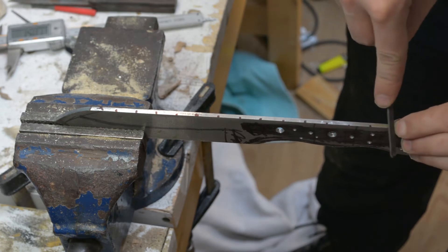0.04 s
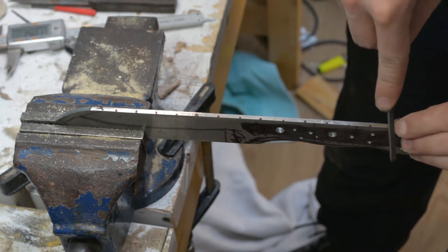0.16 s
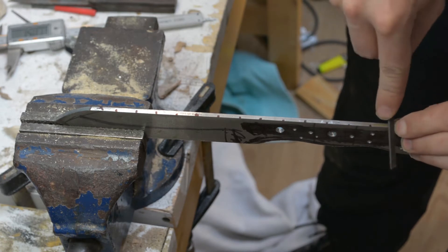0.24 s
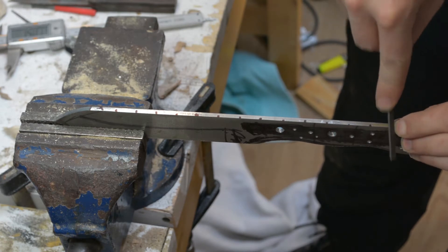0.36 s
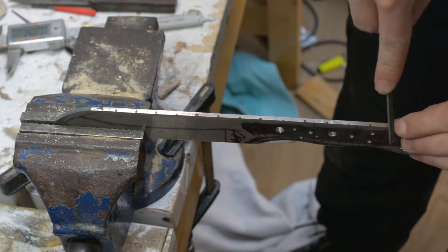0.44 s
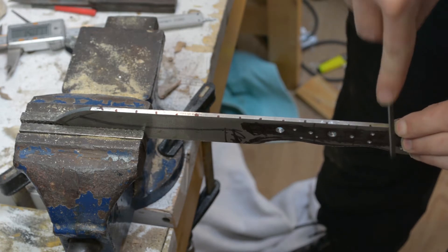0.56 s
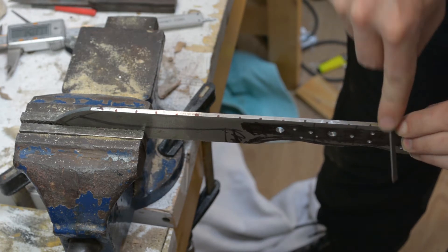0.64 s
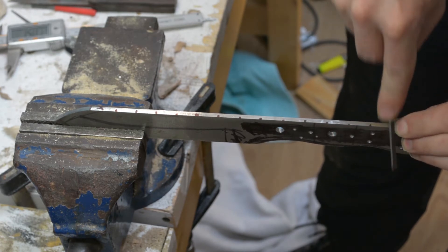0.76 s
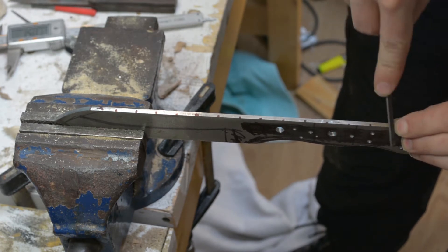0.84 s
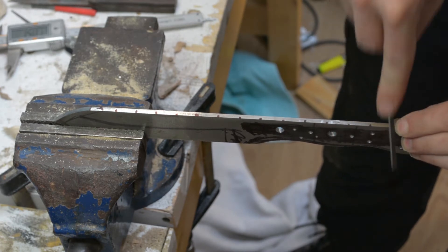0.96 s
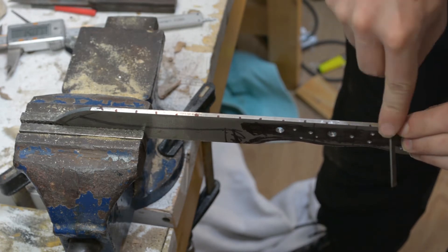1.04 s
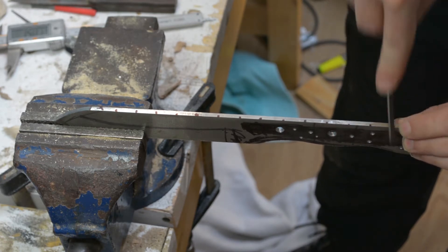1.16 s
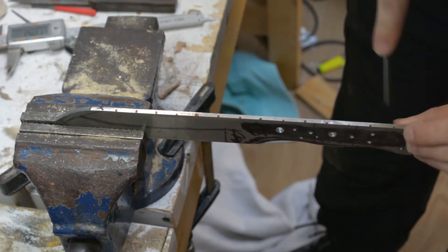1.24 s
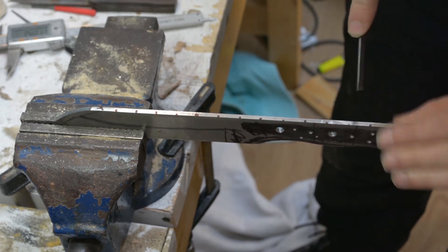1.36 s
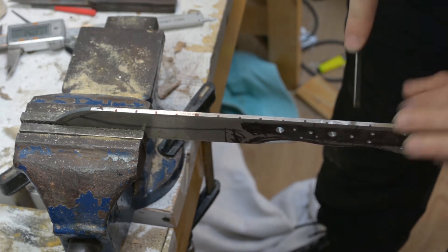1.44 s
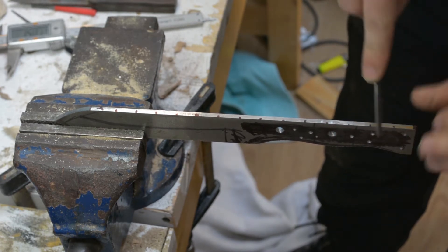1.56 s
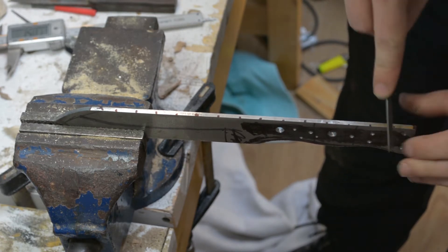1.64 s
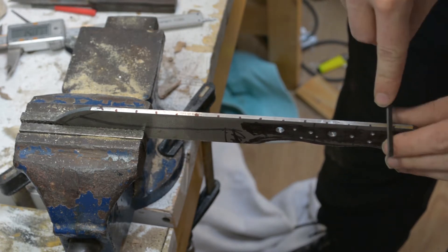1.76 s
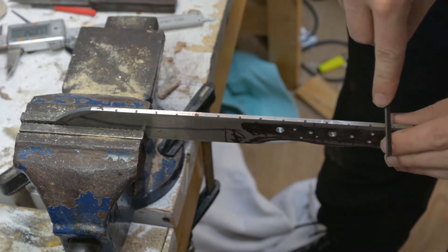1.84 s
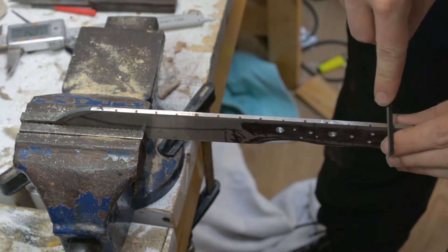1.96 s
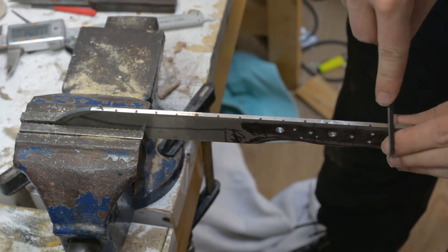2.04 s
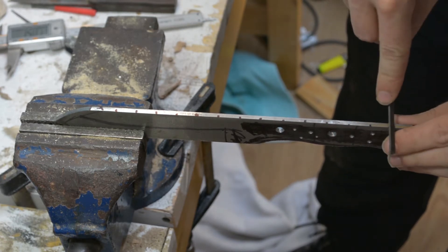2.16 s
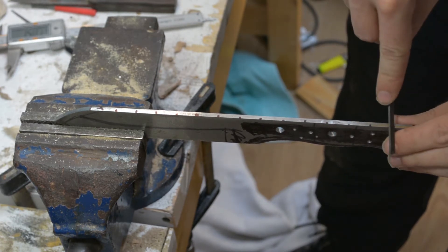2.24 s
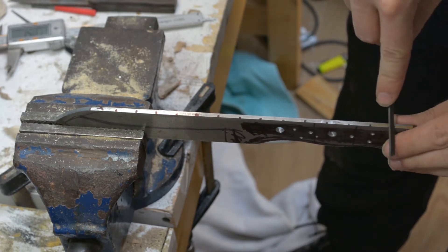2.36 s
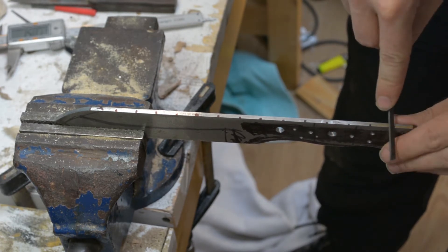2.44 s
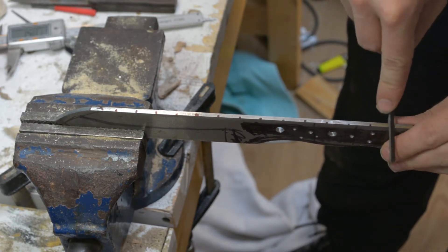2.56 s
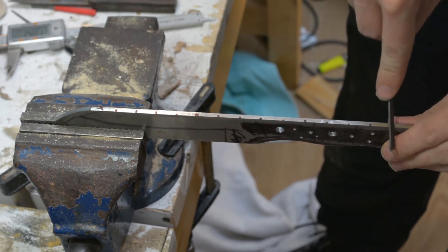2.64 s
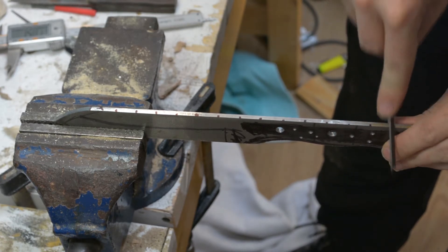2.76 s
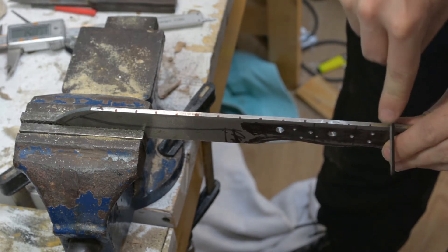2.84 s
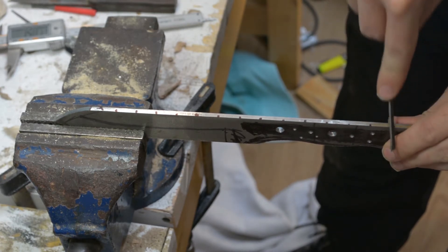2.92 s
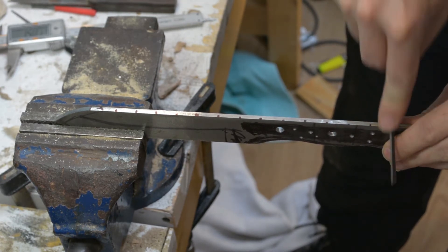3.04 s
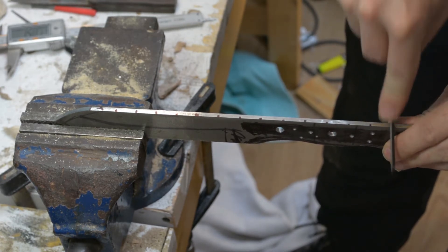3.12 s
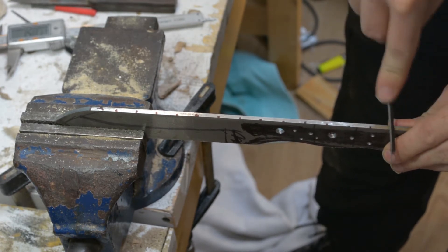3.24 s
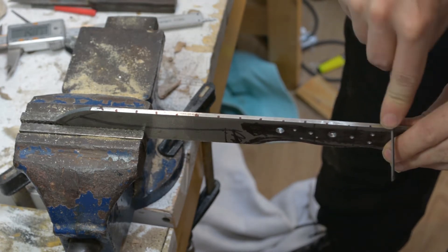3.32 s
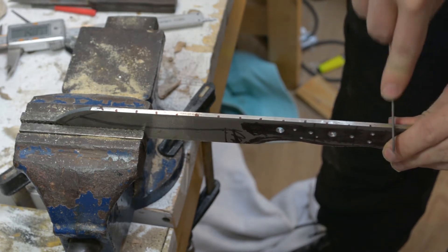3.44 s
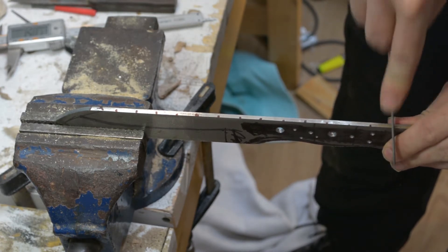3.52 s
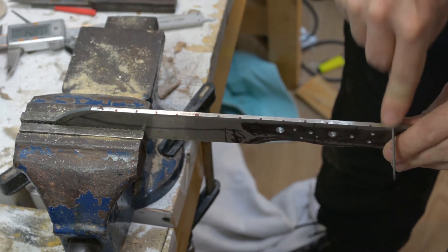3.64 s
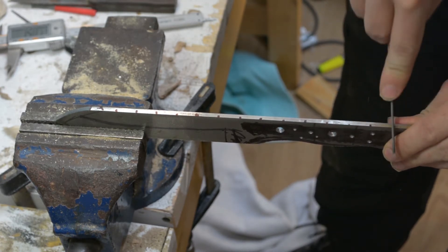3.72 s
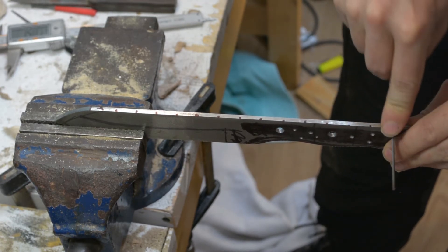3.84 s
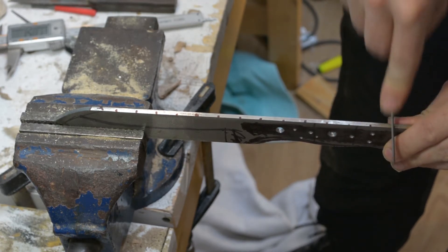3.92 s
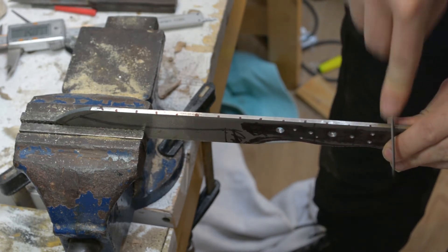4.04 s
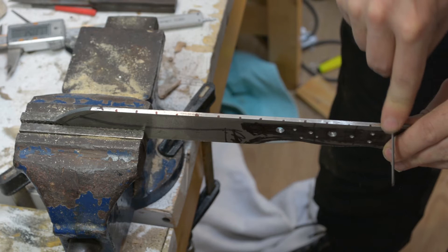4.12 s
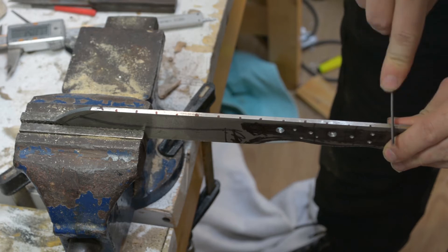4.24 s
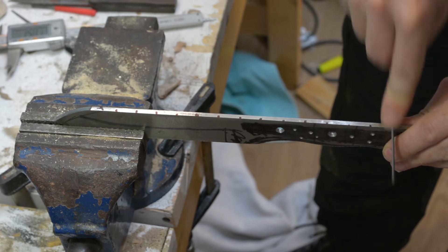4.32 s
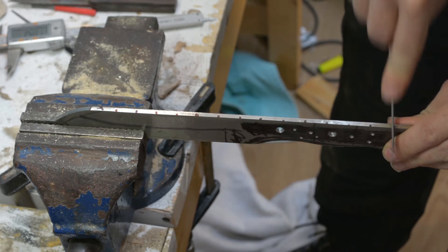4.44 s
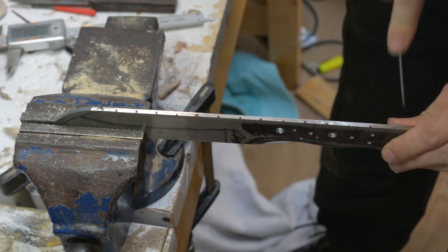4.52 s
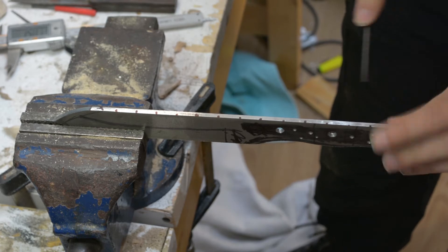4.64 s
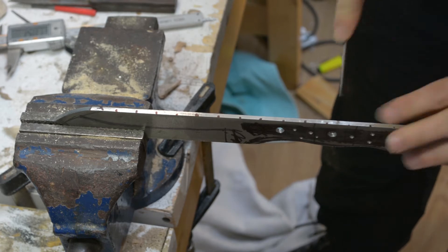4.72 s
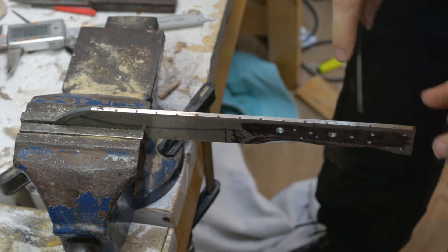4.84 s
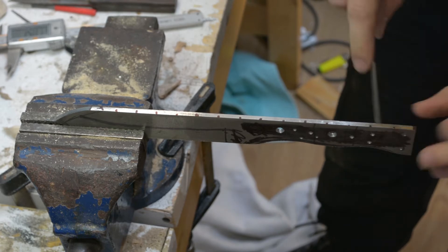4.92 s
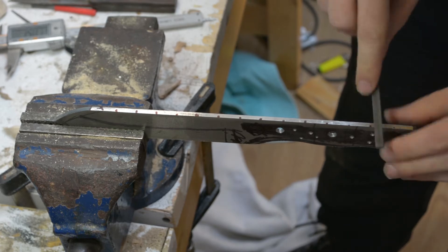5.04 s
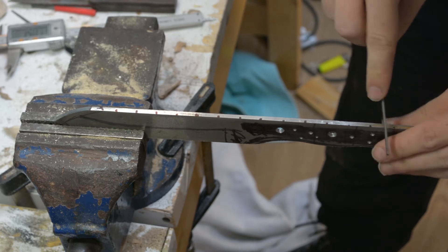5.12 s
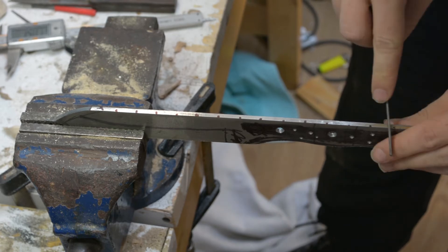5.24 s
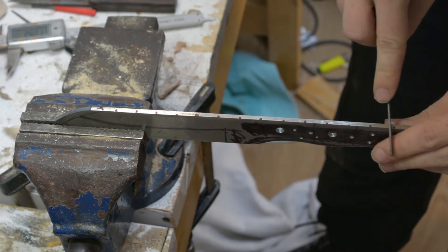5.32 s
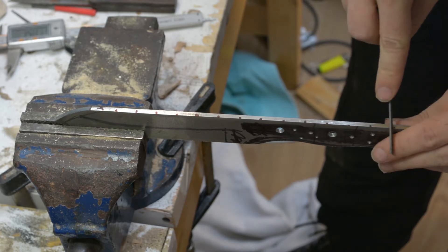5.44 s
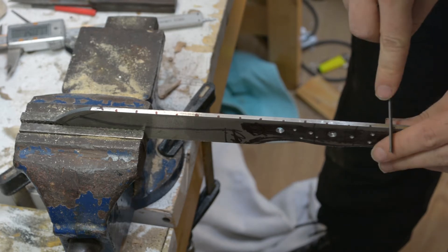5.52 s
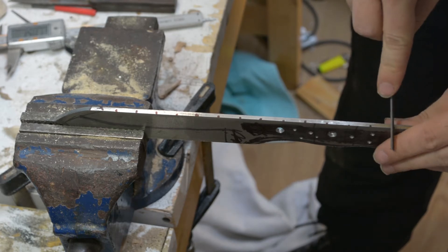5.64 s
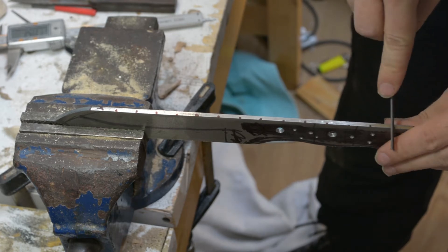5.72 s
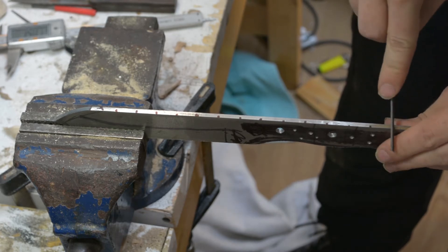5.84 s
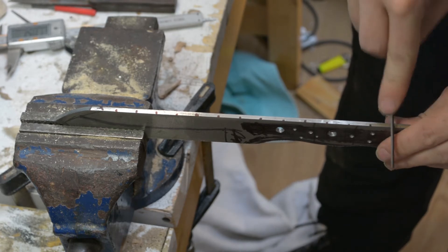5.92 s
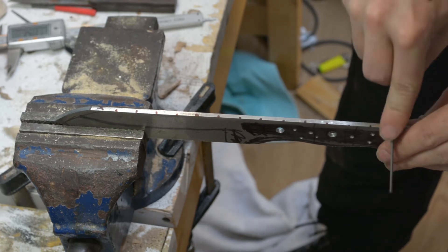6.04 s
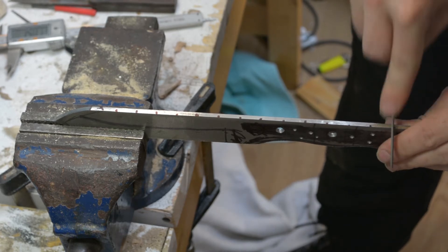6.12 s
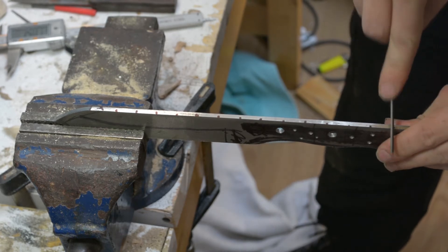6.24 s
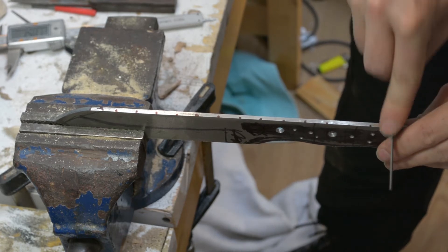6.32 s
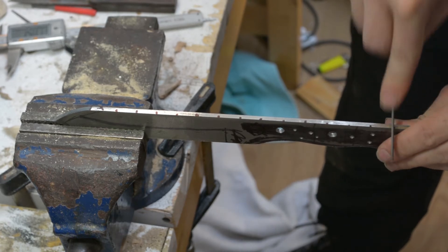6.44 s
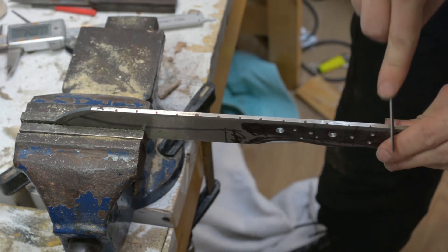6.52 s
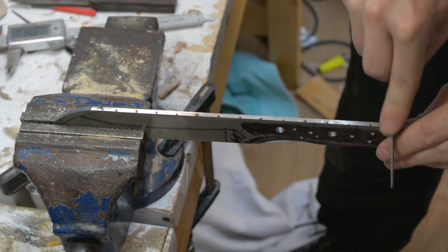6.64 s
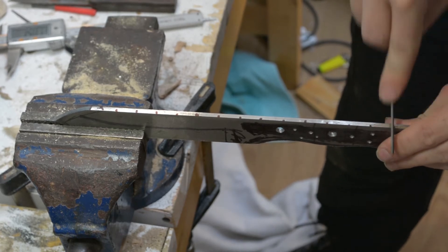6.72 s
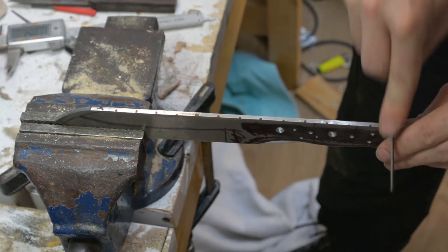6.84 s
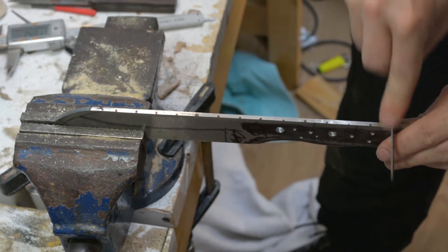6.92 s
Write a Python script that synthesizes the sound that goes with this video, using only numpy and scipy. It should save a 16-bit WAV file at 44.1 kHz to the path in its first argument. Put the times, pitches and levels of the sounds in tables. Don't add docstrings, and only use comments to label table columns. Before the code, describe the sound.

Close, dry metallic filing in a small workshop: gritty rasping strokes with ringing mids and bright scratchy hiss. The first bout accelerates and stops; near silence leaves a faint blade ring and thin electrical whine. Rapid seesaw strokes start almost inaudibly, settle into an even rhythm and stop on an accent. Light clinks and a short scrape precede a final strong burst that continues to the end.

```python
import sys
import numpy as np
from scipy import signal
from scipy.fft import rfft, irfft, next_fast_len
from scipy.io import wavfile
from scipy.ndimage import uniform_filter1d

SR = 44100
rng = np.random.default_rng(int(sys.argv[2]) if len(sys.argv) > 2 else 0)


def unload_wav(signal):
    wavfile.write(
        sys.argv[1],
        SR,
        np.round(np.clip(np.atleast_2d(signal).T, -1, 1) * 32767).astype(np.int16),
    )


def field_ratio(decibels):
    return 10 ** (np.asarray(decibels, dtype=float) / 20)


N = 307818
SIZE = next_fast_len(N + SR)
HZ = np.maximum(np.arange(SIZE // 2 + 1) * SR / SIZE, 1)
TIME = np.arange(N) / SR

# (f/Hz, width/Hz, lift/dB)
BLADE_MODES = [(325, 28, -9), (417, 15, -5), (528, 38, -5.5), (661, 22.5, 3), (757.4, 33, 0.),
               (904, 65, -6.5), (955, 30, -3), (1239, 25.5, 3), (1488, 7, 0), (1630, 10, -20),
               (1834, 13, -0.5), (1948, 32, -2), (2033, 69, -13), (2189, 85, 5), (2660, 180, 1),
               (2880, 14, 3.5), (3183, 13, 4), (3246, 85, 5.5)]


def rms_one(x):
    return x / np.sqrt(np.mean(x ** 2) + 1e-20)


def curve_db(points):
    hz, db = np.transpose(points)
    return np.interp(np.log(HZ), np.log(hz), db)


def below(hz, order):
    return 1 / (1 + (HZ / hz) ** order)


def above(hz):
    return 1 / (1 + (hz / HZ) ** 4)


def causal(gain):
    cepstrum = irfft(np.log(gain + 1e-9), SIZE)
    cepstrum[1:SIZE // 2] *= 2
    cepstrum[SIZE // 2 + 1:] = 0
    return np.exp(rfft(cepstrum))


def through(x, response):
    return irfft(rfft(x, SIZE) * response, SIZE)[..., :N]


def drift(rate_hz):
    r = np.exp(-2 * np.pi * rate_hz / SR)
    noise = rng.standard_normal(N + SR)
    return rms_one(signal.lfilter([1], [1, -2 * r, r * r], noise)[SR:])


def hush():
    # (f/Hz, level/dB per Hz)
    hiss_colour = [(15, -35), (25, -1.5), (93, -10.5), (198, 2), (297, -1), (722, 0), (1050, -1.5),
                   (1380, -2), (5010, -13.5), (5430, -15.5), (5880, -17), (10900, -23), (15500, -34)]
    # (f/Hz, side minus mid/dB)
    hiss_side = [(60, -16), (110, -9), (200, -13.5), (380, -4), (700, -2), (1290, -2.5), (2380, -2),
                 (4400, -1.5), (8120, -1.5), (15000, 0)]
    # (f/Hz, level/dB rms)
    whine = [(199, -79), (5545, -77), (11084, -85)]
    hiss_db = -57
    mid, side = through(rng.standard_normal((2, N)), field_ratio(curve_db(hiss_colour)))
    side = through(side, field_ratio(curve_db(hiss_side)))
    tones = sum(field_ratio(db + 2 + 1.5 * drift(3)) * np.sin(2 * np.pi * hz * TIME) for hz, db in whine)
    gain = field_ratio(hiss_db + .7 * drift(6)) / np.std(mid)
    return gain * np.array([mid + side, mid - side]) + tones


def free_ring(modes, touches):
    out = np.zeros(N)
    for hz, mode_db, t60_s in modes:
        rub = np.zeros(N)
        for start, db, long, tilt in touches:
            level = field_ratio(db + mode_db + tilt * np.log2(hz / 1000))
            rub += level * np.interp(TIME, [start, start + long / 3, start + long], [0, 1, 0])
        r, w = field_ratio(-60 / (t60_s * SR)), 2 * np.pi * hz / SR
        push = rub * rng.standard_normal(N) * 0.33 + 1e-18
        out += signal.lfilter([0, np.sin(w)], [1, -2 * r * np.cos(w), r * r], push)
    return out


def touched_blade():
    # (f/Hz, level/dB, t60/s)
    free_modes = [(371, -24, .2), (866, -19, .36), (1013, -22, .2), (1927, -8, .2), (4910, -11, .15)]
    # (t/s, level/dB, rubbing time/s, tilt/dB per octave)
    fingers = [
        (1.455, -55., 0.05, 0.),
        (5.50, -61., 0.087, -7),
    ]
    # (t/s, level/dB, rubbing time/s, tilt/dB per octave)
    sway = [
        [(62.7, -7, 1)],
        [(1.47, -72, 0.076, 0.0021)],
    ]
    return free_ring(free_modes, fingers) + free_ring(*sway)


def knocked_file():
    # (f/Hz, level/dB, t60/s)
    loose_modes = [(1970, -14, 0.083), (1990, 12, 0.079), (2830, 16, 0.081), (4940, 14.5, 0.12),
                   (5430, 13, 0.079), (10000, -6, 0.03), (11496, -19, 0.057)]
    # (t/s, level/dB, rubbing time/s, tilt/dB per octave)
    knocks = [
        (4.518, -49, 0.012, -5.5),
        (5.45, -63.5, 0.035, -14),
        (5.64, -61, 0.016, -1.5),
    ]
    return free_ring(loose_modes, knocks)


def strokes():
    # (t/s, length/s, level/dB, top speed/0-1, file brightness/dB)
    first_bout = [
        (0.041, 0.063, -34, 0.66, -16),
        (0.168, 0.14, -30, 0.79, 4.5),
        (0.372, 0.15, -29.5, 0.73, 6),
        (0.557, 0.15, -26, 0.71, 1.5),
        (0.77, 0.14, -27.5, 0.8, 6.5),
        (0.949, 0.15, -23, 0.86, 1),
        (1.13, 0.14, -22.0, 0.99, 7.5),
    ]
    second_bout = [(2.405, 0.11, -49, 0.5, -3.5), (2.494, 0.094, -43.5, 0.86, -4),
                   (2.585, 0.15, -42, 0.43, 2), (2.744, 0.11, -31, 0.56, 1.5),
                   (2.874, 0.14, -35.0, 0.58, 3.5), (3.0, 0.12, -29, 0.8, -1), (3.135, 0.14, -32, 0.89, 6),
                   (3.273, 0.11, -28, 0.92, -6), (3.405, 0.12, -29, 0.86, 4), (3.522, 0.13, -33.5, 0.64, 3),
                   (3.655, 0.14, -34.5, 0.73, 3), (3.776, 0.15, -32, 0.59, -0.5),
                   (3.913, 0.13, -35, 0.71, 2.5), (4.032, 0.11, -33.5, 0.83, -3),
                   (4.175, 0.13, -32, 1.01, 2.5), (4.294, 0.15, -34, 0.63, 3.5),
                   (4.427, 0.12, -23, 1.19, 4.5)]
    third_bout = [
        (5.887, 0.2, -30.5, 0.5, -0.5),
        (6.108, 0.14, -22, 0.84, 1.5),
        (6.264, 0.13, -20.5, 0.89, -4),
        (6.416, 0.12, -21, 0.96, 3),
        (6.544, 0.15, -23.5, 0.93, -4),
        (6.695, 0.12, -22, 0.95, 3),
        (6.815, 0.1, -19, 1.07, -3.5),
        (6.922, 0.16, -20, 0.88, 2),
    ]
    strays = [
        (4.714, 0.146, -56.5, 0.5, -0.5),
        (5.07, 0.09, -65, 0.8, 12.5),
        (5.447, 0.14, -56, 0.99, -10),
        (5.526, 0.12, -56, 0.56, -11),
        (5.628, 0.07, -39.5, 0.5, 13),
    ]
    top_at, flick_top_at, stray_top_at = .43, .65, .33
    every = []
    for bout in (first_bout, second_bout, third_bout):
        every += [(*row, top_at) for row in bout[:-1]]
        every.append((*bout[-1], flick_top_at))
    return every + [(*row, stray_top_at) for row in strays]


def hand():
    # (t/s, level/dB, file brightness/dB)
    bites = [(.053, -33, -1), (.176, -28.5, -0.5), (.563, -35, 11), (.951, -24, -7), (1.454, -62, 23),
             (2.752, -27.5, -7.5), (3.012, -35, 2.5), (3.287, -29, 3.5), (3.425, -33, 4), (4.055, -35, -3),
             (4.458, -30, -8.5), (4.518, -28.5, 15), (5.640, -43, 15), (5.891, -31, 5.5),
             (6.425, -32, -3.5)]
    bite_fade_s, overlap_s = .038, .015
    crawl = .35
    power, speed, bright = np.full(N, 1e-12), np.zeros(N), np.zeros(N)
    for start, length, db, fastest, bright_db, top in strokes():
        bitten = min(abs(start - row[0]) for row in bites) < .02
        first, last = start - overlap_s * (not bitten), start + length - .01
        now = slice(max(int(first * SR), 0), int(last * SR))
        share = np.interp(TIME[now], [first, start + length * np.clip(top, .05, .85), last], [0, .5, 1])
        swing = np.maximum(np.sin(np.pi * share), 0)
        weight = (field_ratio(db) * swing ** np.where(share < .5, 1.3, .7)) ** 2
        pace = swing ** np.where(share < .5, 1.1, .12)
        power[now] += weight
        speed[now] += weight * fastest * (crawl + (1 - crawl) * pace)
        bright[now] += weight * (field_ratio(bright_db) * swing ** 0.66) ** 2
    for start, db, bright_db in bites:
        now = slice(int(start * SR), int((start + 8 * bite_fade_s) * SR))
        weight = (field_ratio(db) * np.exp((start - TIME[now]) / bite_fade_s)) ** 2
        power[now] += weight
        speed[now] += weight * .45
        bright[now] += weight * field_ratio(bright_db) ** 2
    return np.sqrt(power), speed / power, np.sqrt(bright)


def teeth(speed, wander, jitter, uneven_db):
    teeth_per_s = 880.
    rate = teeth_per_s * np.maximum(speed, .15) * (1 + wander * drift(25) + jitter * drift(400))
    caught = np.diff(np.floor(np.cumsum(rate / SR)), prepend=0)
    bite = field_ratio(uneven_db * rng.standard_normal(N) - 1.0)
    return caught * np.sqrt(SR / rate) * bite


def swarf(per_s, spread_db):
    sizes = field_ratio(spread_db * np.minimum(rng.exponential(1, N), 4))
    sizes = sizes * rng.choice([-1, 1], N)
    return rms_one(sizes * (rng.random(N) < per_s / SR))


def load(force, speed, own_speed, width, rings_s):
    r = np.exp(-1 / (rings_s * SR))
    match = 1 / (1 + ((speed - own_speed) / width) ** 2) ** 2
    return np.sqrt(signal.lfilter([1 - r], [1, -r], force ** 2 * match))


def driven(rasp, response, level):
    power = uniform_filter1d(through(rasp, response) ** 2, size=SR // 25)
    return rfft(level * rasp / np.sqrt(power), SIZE) * response


def resonant(modes, between_db):
    # (f/Hz, level/dB per Hz)
    body_colour = [(18, -38), (30, -23), (369, 3.5), (420, 8), (606, -8), (897, 0), (1110, -10.5),
                   (1910, -2), (2360, -11.5), (2830, -10.5), (3680, -22.5), (4190, -18.5), (5170, -26.5),
                   (9430, -32.5), (13500, -41), (15500, -51)]
    power = field_ratio(between_db) ** 2
    power = power + sum(field_ratio(db) ** 2 / (1 + (2 * (HZ - hz) / width) ** 2) for hz, width, db in modes)
    return causal(field_ratio(curve_db(body_colour)) * np.sqrt(power))


def vice_and_bending(rasp, vice, bent):
    body = resonant(BLADE_MODES, between_db=-5.5) * above(48)
    low, bend = below(620, 6), below(1100, 6)
    shaking = field_ratio(-13.0) * driven(rasp, body * low, level=vice)
    return shaking + field_ratio(-17.0) * driven(rasp, body * (bend - low), level=bent)


def blade_ring(rasp, modes):
    return rfft(rasp, SIZE) * resonant(modes, between_db=-10.5) * (1 - below(1100, 6)) * (1 - above(3600))


def file_ring(chips, speed, modes):
    air = above(8000)
    fast_chips = chips * field_ratio(-3.0) * speed ** 0.5
    spectrum = rfft(chips, SIZE) * (1 - air) + rfft(fast_chips, SIZE) * air
    return spectrum * resonant(modes, between_db=-5.0) * above(3600) * field_ratio(-6.5)


def filing():
    # (t/s, contact favouring lower over upper blade modes/dB, evenness of tooth clicks/dB,
    # weight into the vice/dB, weight into bending/dB)
    hold = [(0.1, 1, -1.5, -7, 3), (0.251, -1, -2.5, -1, 1.5), (0.451, 15, -1.0, -2, -5),
            (0.649, 0.5, 0.5, -0.5, -0.5), (1.021, 0.5, -1.0, -4, -2.5), (1.211, 13, 1.5, -2.5, -8),
            (2.501, 3, -1.5, 1, 0.), (2.9, 10.5, -1.5, -6, 3.5), (3.3, 0.5, -2, 1, 1),
            (3.8, 0, -2, -4.5, -3.5), (4.3, 5.5, -1.5, 1.5, 1), (4.551, 12, 0.5, -14.5, -13),
            (5.552, -5, 0., 3, -0.5), (5.67, -14, 1.5, -15, 1.5), (5.99, -2, 1, -1, 4),
            (6.2, -2.5, -0.5, -6, -5), (6.749, -5, 3, -2, -3), (6.98, 7.5, -3, -6.5, -4)]
    # (f/Hz, width/Hz, level/dB)
    file_table = [(4293, 67, -1), (4670, 12, -47), (4870, 31, 0.), (5640, 240, -7), (6070, 64, -12),
                  (6530, 62, -12), (7190, 27, -2), (7320, 45, -0.5), (8300, 85, -11), (9450, 75, -0.5),
                  (10660, 1500, -17), (11830, 300, -16)]
    force, speed, bright = hand()
    s, *grip_db = np.transpose(hold)
    place, even, leaning, bending = (field_ratio(np.interp(TIME, s, db)) for db in grip_db)
    vice = field_ratio(2.) * leaning * load(force, speed, own_speed=.38, width=.27, rings_s=.012)
    bent = field_ratio(-2.) * bending * load(force, speed, own_speed=.93, width=.45, rings_s=.008)
    judder = field_ratio(1.31 * drift(31))
    rasp = field_ratio(-5.5) * np.sqrt(even) * teeth(speed, wander=.045, jitter=.045 / even, uneven_db=2.5)
    rasp += field_ratio(-3.5) / even * swarf(4000, spread_db=2.5)
    hiss = field_ratio(1.5) * rasp + swarf(7000, spread_db=-1.0)
    out = vice_and_bending(rasp, vice, bent)
    place = place * field_ratio(7.2 * drift(10.2))
    shares = np.array([place, 1 / place]) / np.hypot(place, 1 / place) * field_ratio(3.0)
    blade_families = np.split(BLADE_MODES, [14], axis=0)
    file_modes = [(hz, width, db / 2.1 + 11.5) for hz, width, db in file_table]
    for family, share in enumerate(shares):
        out += blade_ring(share * force * judder * rasp, blade_families[family])
        chips = field_ratio(2.22 * drift(9.0)) * bright * judder * hiss
        out += file_ring(chips, speed, file_modes[family::2])
    return field_ratio(13.) * irfft(out, SIZE)[:N]


def workshop(x):
    # (f/Hz, side minus mid/dB)
    room_side = [(60, -35), (300, -60), (700, -15), (1300, -39), (2400, -8), (4400, -13), (8000, -1),
                 (15000, 0.5)]
    # (f/Hz, left minus right/dB)
    lean_table = [(500, 0), (1500, 0.87), (3000, 1.2), (6000, 1), (9000, 2), (14000, 3)]
    room_t60_s, room_db = 0.23, -3.5
    after = np.arange(SR // 2) / SR
    tails = rng.standard_normal((2, SR // 2)) * field_ratio(-60 * after / room_t60_s) * (after > .004)
    mid, side = rfft(tails / np.sqrt(np.sum(tails[0] ** 2)), SIZE)
    middle = through(x, 1 + field_ratio(room_db) * mid)
    lean = np.tanh(curve_db(lean_table) * np.log(10) / 40)
    across = through(middle, lean) + through(x, side * field_ratio(curve_db(room_side) - 6.0))
    return np.array([middle + across, middle - across])


def scene():
    return hush() + workshop(touched_blade() + knocked_file() + filing())


def low_pass(x):
    return signal.sosfilt(signal.butter(12, 15700, fs=SR, output="sos"), x)


def record(dry):
    return low_pass(dry)


dry = scene()
out = record(dry)
unload_wav(out)
```